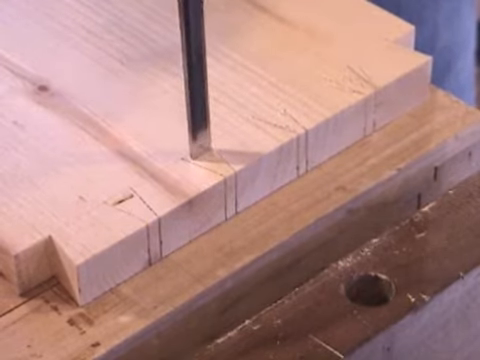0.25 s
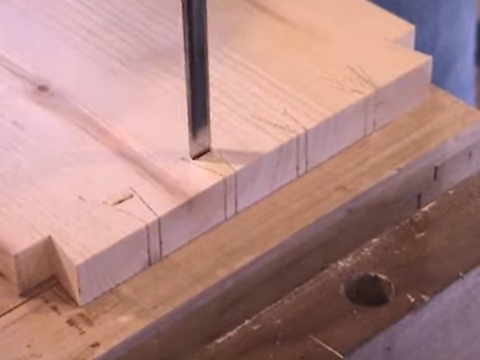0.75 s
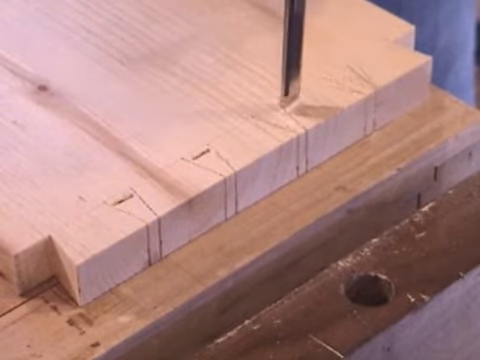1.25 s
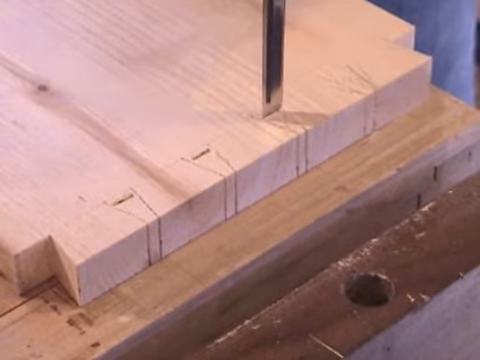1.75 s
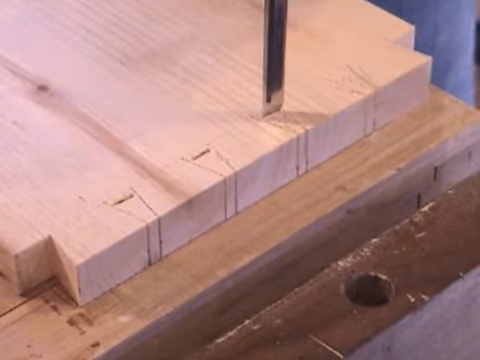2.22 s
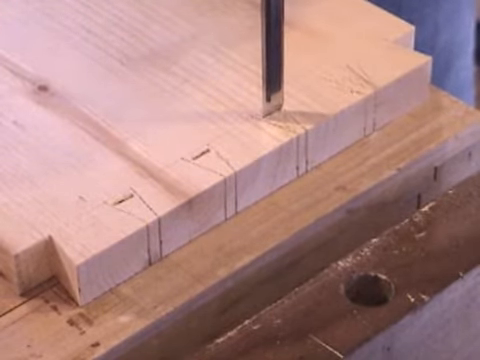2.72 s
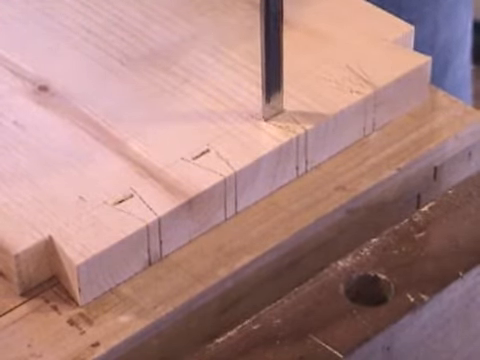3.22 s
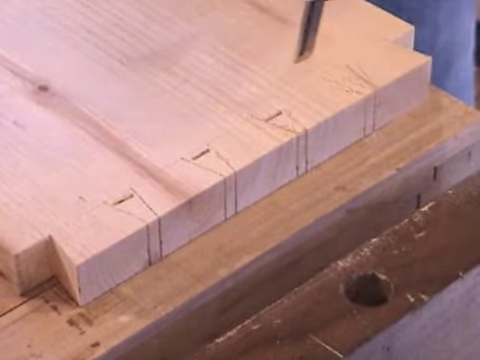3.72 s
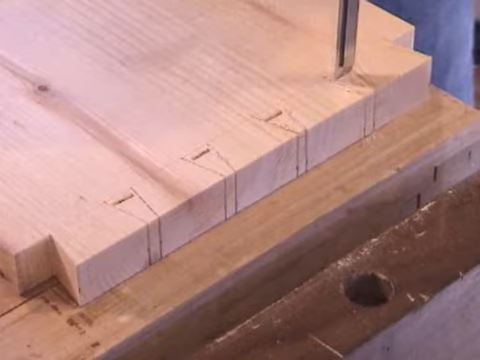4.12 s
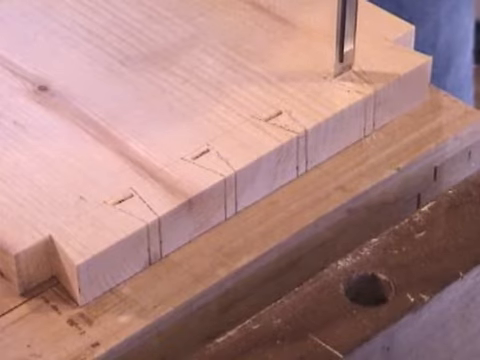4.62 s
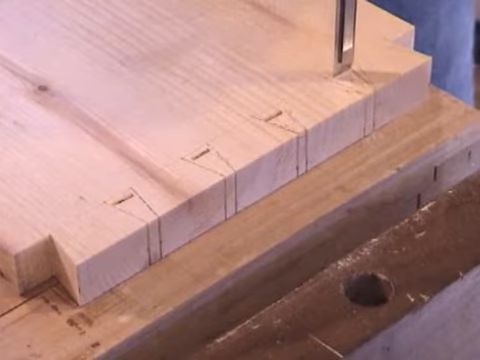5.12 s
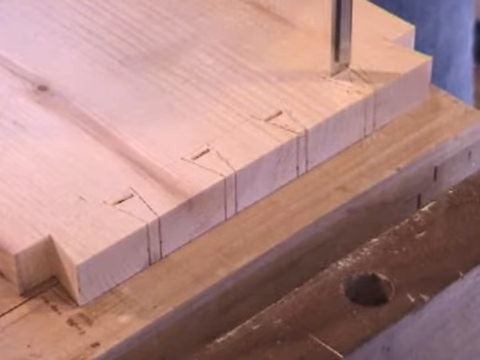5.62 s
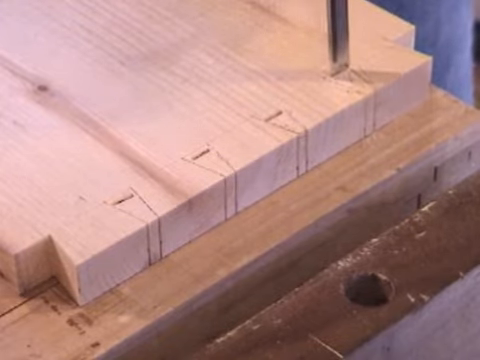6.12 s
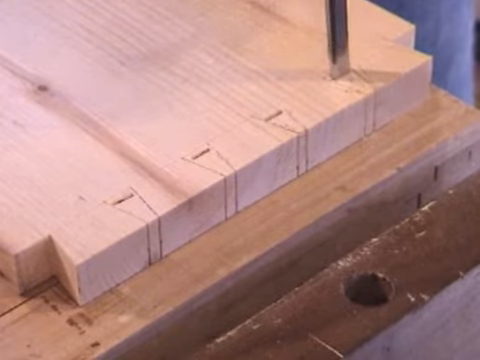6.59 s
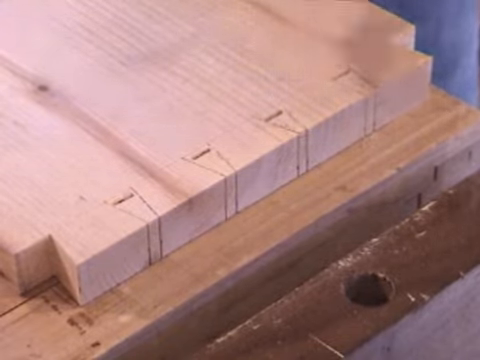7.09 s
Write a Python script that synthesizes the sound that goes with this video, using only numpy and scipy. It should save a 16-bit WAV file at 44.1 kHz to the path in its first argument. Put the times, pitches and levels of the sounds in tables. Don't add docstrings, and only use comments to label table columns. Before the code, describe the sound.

Close to a camera microphone, a mallet drives a chisel into a board on a bench. Three pairs of loud, dry cracks come about three seconds apart, the two blows of each pair a third of a second apart. Each has a woody knock, low bench ring and dense bare-room echo, held flat by limiting before fading. Between pairs lie tiny scuffs, lamp hum and thin tape-drive whine.

```python
import sys
import numpy as np
from scipy import signal
from scipy.io import wavfile
from scipy.ndimage import uniform_filter1d

SR = 44100
rng = np.random.default_rng(int(sys.argv[2]) if len(sys.argv) > 2 else 0)


def rack_gain(trim_db):
    fader = np.asarray(trim_db, float)
    return 10 ** (fader / 20)


def digitize_waveform(pressure):
    field = np.atleast_2d(pressure).T
    bounded = np.clip(field, -1, 1)
    quanta = np.round(bounded * 32767).astype(np.int16)
    wavfile.write(sys.argv[1], SR, quanta)


N = 324135

# start_s, strength_db, crack_db, board_knock_hz, handle_ring_hz
BLOWS = [
    (0.0836, 0, -3.5, 710, 860),
    (0.4295, 4, -6, 796, 2230),
    (2.8768, -1, -2, 730, 1300),
    (3.2274, 1, 0.5, 800, 1760),
    (6.1086, -1.5, -5.5, 560, 1700),
    (6.4698, 1, -3, 330, 2390),
]
# brightness_db_per_octave, upper_knock_hz
SEATING = [
    (-.2, 1570),
    (.6, 2040),
]
# echo_place_rad, bench_db, knock_db, upper_knock_db, brightness_db_per_octave
CUTS = [
    (0.01, -1.7, 5, 2, 0.01),
    (1.5, 0.25, 3.5, 4, -0.17),
    (2.3, 1, 4, 4, 0.13),
]
# pitch_hz, level_db, t60_s
STEEL_MODES = [(8370, 6.5, 0.002), (12000, 7.5, 0.0014), (6740, 2.5, 0.003)]
# pitch_hz, level_db, t60_s
MALLET_MODES = [(5370, 9.5, 0.0059), (4300, 11, 0.0074), (3530, 1.5, 0.0066), (2530, 8.5, 0.029),
                (2010, -2, 0.048), (1420, 5.5, 0.047), (980, 10.5, 0.0077)]
# pitch_hz, level_db, t60_s
BENCH_MODES = [(136.84, -3.5, 0.44), (219.2, -12.5, 0.45), (269.5, -19.5, 0.85), (305.6, -18, 0.68),
               (324.8, -2, 0.34), (355.6, -13.5, 0.77), (429.4, -9.5, 0.61), (507.6, -6.5, 0.53),
               (563.5, -14.5, 0.61), (697, -12.5, 0.29), (760, -5.5, 0.32), (816, 2, 0.4), (948, -11, 0.64),
               (994, -15.5, 0.24)]
# pitch_hz, level_db, t60_s
PANEL_MODES = [(127.1, -36, 1.75), (137, -39.5, 2.8), (300, -53.5, 5.9)]
# pitch_hz, level_db_per_hz, t60_s, left_right_likeness
ECHO = [(30, -13, .29, .6), (60, -36, 0.23, .9), (112, -9.5, 0.45, 0.63), (330, -2, 0.56, 0.87),
        (800, -1.5, 0.52, .84), (2610, -11.5, .48, 0.75), (6540, -22, 0.32, 0.14), (10800, -37, 0.2, 0.28)]
# delay_s, level_db (negative dips), length_s
ECHO_LUMPS = [(.0075, -1.5, 0.0013), (0.079, -4, 0.0071), (0.122, -2, 0.0085), (0.152, 0, .008),
              (0.177, 1.5, 0.0045)]
# start_s, level_db, length_s, width_hz
SCUFFS = [(1.157, -57.5, 0.037, 99.8), (1.218, -55.5, 0.024, 80), (1.851, -71, .2, 307),
          (2.055, -63, .017, 240), (2.52, -61.5, 0.045, 280), (3.84, -57.5, 0.045, 790),
          (5.165, -59, .025, 120), (5.22, -62, .035, 490), (6.948, -56, 0.015, 400), (7.099, -65, .14, 720)]
# start_s, level_db, length_s, width_hz
THUDS = [
    (1.205, -57.5, .022, 130),
    (3.87, -59, 0.044, 200),
    (6.85, -63.5, 0.29, 220),
]
# start_s, level_db, length_s, width_hz
SLEEVE = [
    (6.95, -71.5, 0.31, 8200),
]
# pitch_hz, level_db, t60_s
TICK_MODES = [(1870, 2, .014), (2750, -1, .014), (3700, 2, .014), (4900, -2, .014)]
# mains_multiple, level_db_rms, left_minus_right_db
HUM = [(1, -77.5, -5), (2, -71.5, 2), (3, -61.5, 2), (4, -71.5, -1.5)]
# pitch_hz, level_db_rms
DRUM = [(75, -88.5), (520, -79), (975, -69.5), (1425, -71), (1800, -76.5), (2620, -84), (3300, -85.5),
        (10500, -93.5)]
GEAR_HZ, SHAFT_HZ = 158.51, 112.02
# centre_hz, spacing_hz
COMB_HZ = [(19 * GEAR_HZ, GEAR_HZ), (2915.75, SHAFT_HZ), (6354.9, SHAFT_HZ), (6407.7, SHAFT_HZ),
           (3898.5, SHAFT_HZ)]
# top_db_rms, loss_per_step_db, extra_loss_on_odd_steps_db
COMB_DB = [(-74.5, 1.8, -0.7), (-77.5, 1.6, 10), (-81, 0.82, 1), (-83.5, 2.2, -7), (-92.5, 4.4, -15)]
MOTOR_HZ = [2543.6, 2510.0, 2601.5, 2664.7, 2713.2, 3197.0, 3311.4, 3655.9, 4074.5, 4094.7, 5785.0, 6208.3,
            6314.6, 6948.5]
MOTOR_DB = [-82.5, -87, -81, -75, -73.5, -75.9, -83.7, -82.5, -85, -79.5, -91, -79, -83, -87]
# pitch_hz, width_hz, level_db_rms
CASE = [(1376, 230, -67.5), (2850, 700, -73), (6400, 300, -74)]
# pitch_hz, level_db_per_hz, left_right_likeness
AIR = [(25, -6, -.4), (90, -8.5, -0.5), (168, -4, -0.73), (400, -8, 0.24), (790, -2, 0.62),
       (1700, -12, 0.48), (5500, -16, 0.08), (10800, -22, 0.25)]
EDGES_HZ = 24 * 2 ** np.arange(0, 9.1, 1 / 3)

WOOD_LAG_S, HANDLE_T60_S = 0.0004, 0.02
HANDLE_DB, HANDLE_DB_PER_OCTAVE = 6.5, 5
BENCH_DB, BENCH_FOLLOWS = -2, 0.4
ECHO_DB, ECHO_TOP_HZ, BUILD_UP_CYCLES = 3, 11550, 1.9
LATE_DB, LATE_T60_S = -44.5, 1.6
LATE_BASS_HZ, LATE_BASS_DB_PER_OCTAVE = 170, 8
GRAIN_DB, GRAIN_HZ = 1.12, 120
KNOCK_OCTAVES = 0.52
SINK_RAD = 0.28
SCUFF_HZ, THUD_HZ, SLEEVE_HZ = 828, 232, 6850
TICK_S, TICK_DB = 3.8605, -46
MAINS_HZ, DRUM_HZ = 119.95, 149.85
AIR_DB = -55
CEILING, OVERSHOOT, CLAMP_S = 0.77, 0.16, 0.0008


def blows():
    return crack() + bench() + room_echo()


def crack():
    crack_db = np.transpose(BLOWS)[2]
    wood = struck(MALLET_MODES, crack_db, spread_db=2.0, sign=-0.99) + handle()
    wood = signal.lfilter([0.3], [1, -0.7], np.roll(wood, round(WOOD_LAG_S * SR)))
    both = rack_gain(3.0) * struck(STEEL_MODES, crack_db, spread_db=3.5, sign=-0.98) + rack_gain(1.0) * wood
    return both + 0.37 * np.gradient(both) * [[-1], [1]]


def handle():
    out = np.zeros(N)
    for start_s, *_, hz in BLOWS:
        click = np.zeros(N)
        click[round(start_s * SR)] = rack_gain(HANDLE_DB + HANDLE_DB_PER_OCTAVE * np.log2(hz / 1000))
        out += ring(click, hz, HANDLE_T60_S)
    return out


def bench():
    strength_db = np.transpose(BLOWS)[1]
    cut_db = np.repeat(np.array(CUTS)[:, 1], 2)
    level_db = cut_db + BENCH_DB + BENCH_FOLLOWS * strength_db
    modes = struck(BENCH_MODES + PANEL_MODES, level_db, spread_db=2.0, sign=-0.988)
    modes = signal.lfilter([0.15], [1, -0.85], np.roll(modes, round(WOOD_LAG_S * SR)))
    return modes * rack_gain([[-0.7], [0.7]])


def struck(modes, level_db, spread_db, sign):
    at = [round(row[0] * SR) for row in BLOWS]
    out = np.zeros(N)
    chance = rng.standard_normal((len(BLOWS), len(modes)))
    for k, (hz, mode_db, t60_s) in enumerate(modes):
        clicks = np.zeros(N)
        clicks[at] = rack_gain(level_db + mode_db + spread_db * chance[:, k]) * sign ** (k + 1)
        out += ring(clicks, hz, t60_s)
    return out


def room_echo():
    length = round(1.2 * SR)
    out = np.zeros((2, N + 2 * SR))
    t = np.arange(length) / SR
    uneven = clumps(t)
    places = [noise_bands(rng.standard_normal((2, 2, length)), lambda hz: at_hz(ECHO, hz)[2])
              for _ in range(2)]
    for (hz, here), (_, there) in zip(*places):
        level_db, t60_s, _ = at_hz(ECHO, hz)
        build_up = 1 - np.exp(-t * hz / BUILD_UP_CYCLES)
        late_db = LATE_DB + LATE_BASS_DB_PER_OCTAVE * min(0, np.log2(hz / LATE_BASS_HZ))
        decay = np.hypot(rack_gain(-60 * t / t60_s), rack_gain(late_db - 60 * t / LATE_T60_S))
        shape = rack_gain(ECHO_DB + 10.5 + level_db) * build_up * uneven * decay
        for k, blow in enumerate(BLOWS):
            place = CUTS[k // 2][0] + SINK_RAD * (k % 2)
            pattern = np.cos(place) * here + np.sin(place) * there
            i = round((blow[0] + WOOD_LAG_S) * SR)
            out[:, i:i + length] += rack_gain(blow_colour_db(k, hz)) * shape * pattern
    return signal.sosfilt(signal.butter(8, ECHO_TOP_HZ, fs=SR, output="sos"), out[:, :N])


def blow_colour_db(k, hz):
    _, strength_db, _, knock_hz, _ = BLOWS[k]
    tilt_db, upper_hz = SEATING[k % 2]
    _, _, lower_db, upper_db, cut_tilt_db = CUTS[k // 2]
    knock_db = sum(db * np.exp(-(np.log2(hz / centre_hz) / KNOCK_OCTAVES) ** 2)
                   for centre_hz, db in ((knock_hz, lower_db), (upper_hz, upper_db)))
    return strength_db + (tilt_db + cut_tilt_db) * np.log2(hz / 800) + knock_db


def clumps(t):
    grain_db = GRAIN_DB * every_sample(drift(GRAIN_HZ))[:len(t)]
    lump_db = sum(db * np.exp(-((t - delay_s) / length_s) ** 2) for delay_s, db, length_s in ECHO_LUMPS)
    return rack_gain(uniform_filter1d(grain_db, size=40) + lump_db)


def scuffs():
    out = np.zeros(N + 2 * SR)
    t = np.arange(2 * SR) / SR
    for table, hz in ((SCUFFS, SCUFF_HZ), (THUDS, THUD_HZ), (SLEEVE, SLEEVE_HZ)):
        for start_s, db, length_s, width_hz in table:
            i = round(start_s * SR)
            puff = t / length_s * 2 * np.exp(-t / length_s * 2)
            rub = band_noise(hz - width_hz / 2, hz + width_hz / 2, size=len(t))
            out[i:i + len(t)] += rack_gain(db + 15.5) * rub * puff
    click = np.arange(N) == round(TICK_S * SR)
    tick = sum(ring(rack_gain(TICK_DB + db) * click, hz, t60_s) for hz, db, t60_s in TICK_MODES)
    return out[:N] + tick


def tape_drive():
    drum_hz = [(k + 0.5) * DRUM_HZ for k in range(70)]
    drum = sum(tone(hz, at_hz(DRUM, hz)[0], 0.63) for hz in drum_hz)
    gears = sum(comb(*hz, *db, count=6) for hz, db in zip(COMB_HZ, COMB_DB))
    motor = sum(tone(hz, db, 1.4) for hz, db in zip(MOTOR_HZ, MOTOR_DB))
    whine = rack_gain(1.5) * (gears + motor)
    hiss = sum(rack_gain(db) * band_noise(hz - width_hz / 2, hz + width_hz / 2, size=N)
               for hz, width_hz, db in CASE)
    return placed(drum, -6, count=2) + placed(whine + hiss, -0.3, count=2)


def comb(centre_hz, step_hz, top_db, step_db, odd_db, count):
    return sum(tone(centre_hz + k * step_hz, top_db - step_db * abs(k) - odd_db * (k % 2), 1.3, scatter=0.46)
               for k in range(-count, count + 1))


def lamp_hum():
    return sum(placed(tone(k * MAINS_HZ, db, 0.7), pan_db, count=14) for k, db, pan_db in HUM)


def air():
    out, gust = 0, drift(4)
    for hz, band in noise_bands(rng.standard_normal((2, 2, N)), lambda hz: at_hz(AIR, hz)[1]):
        waver_db = 1.6 * np.exp(-np.log2(hz / 800) ** 2 / 1.2)
        flicker = 0.7 * gust + 0.8 * drift(12)
        out = out + band * every_sample(rack_gain(at_hz(AIR, hz)[0] + waver_db * flicker))
    return rack_gain(AIR_DB) * rms_one(out)


def ring(clicks, hz, t60_s):
    r, w = rack_gain(-60 / (t60_s * SR)), 2 * np.pi * hz / SR
    return signal.lfilter([0, np.sin(w)], [1, -2 * r * np.cos(w), r * r], clicks + 1e-18)


def tone(hz, level_db, waver_db, scatter=1):
    phase = 2 * np.pi * (hz * np.arange(N) / SR + scatter * rng.random())
    return every_sample(rack_gain(level_db + 5 + waver_db * drift(7.6))) * np.sin(phase)


def noise_bands(white, likeness):
    for k, (low, high) in enumerate(zip(EDGES_HZ, EDGES_HZ[1:])):
        band = signal.butter(2, [low, high], "band", fs=SR, output="sos")
        mid, side = signal.sosfilt(band, white[k % 2])
        hz = np.sqrt(low * high)
        alike = np.clip(likeness(hz), -1, 1)
        yield hz, np.sqrt(1 + alike) * mid + np.sqrt(1 - alike) * side * [[1], [-1]]


def band_noise(low_hz, high_hz, size):
    band = signal.butter(2, [low_hz, high_hz], "band", fs=SR, output="sos")
    return rms_one(signal.sosfilt(band, rng.standard_normal(size)))


def placed(x, pan_db, count):
    return np.stack([np.roll(x, count) * rack_gain(pan_db / 2), x * rack_gain(-pan_db / 2)])


def drift(rate_hz):
    r = np.exp(-80 * np.pi * rate_hz / SR)
    chance = rng.standard_normal(N // 40 + 2001)
    return rms_one(signal.lfilter([1], [1, -2 * r, r * r], chance)[2000:])


def every_sample(slow):
    return np.repeat(slow, 40)[:N]


def at_hz(rows, hz):
    rows = np.array(rows)
    return [np.interp(np.log(hz), np.log(rows[:, 0]), column) for column in rows.T[1:]]


def rms_one(x):
    return x / np.sqrt(np.mean(x ** 2) + 1e-20)


def scene():
    return blows() + scuffs() + tape_drive() + lamp_hum() + air()


def roll_off(x):
    return signal.sosfilt(signal.butter(12, 12380, fs=SR, output="sos"), x)


def record(dry):
    keep = np.exp(-1 / (0.0027 * SR))
    loudness = np.sqrt(signal.lfilter([1 - keep], [1, -keep], np.mean(dry ** 2, axis=0)))
    level = dry / (1 + (loudness / 0.37) ** 4) ** (1 / 4) / 0.81
    slow = np.exp(-1 / (CLAMP_S * SR))
    clamp = signal.lfilter([1 - slow], [1, -slow], np.tanh(loudness / 0.15))
    slack = 1 + OVERSHOOT * (1 - clamp)
    flat = CEILING * level / (1 + (level / slack) ** 6) ** (1 / 6)
    cut = signal.sosfilt(signal.cheby2(8, 45, 12450, fs=SR, output="sos"), flat)
    return roll_off(cut)


dry = scene()
out = record(dry)
digitize_waveform(out)
```